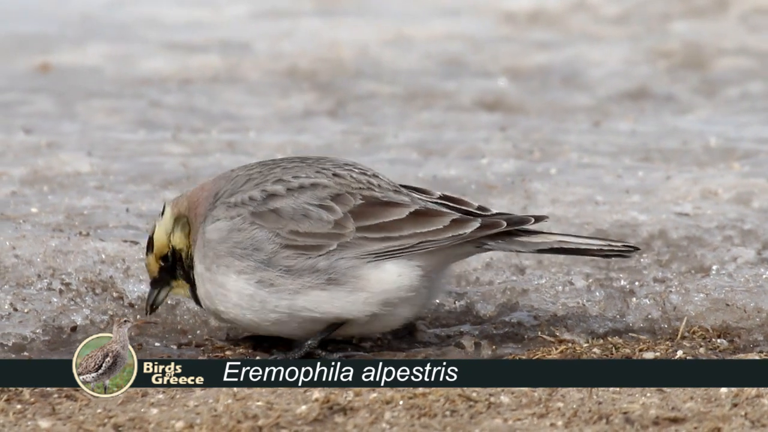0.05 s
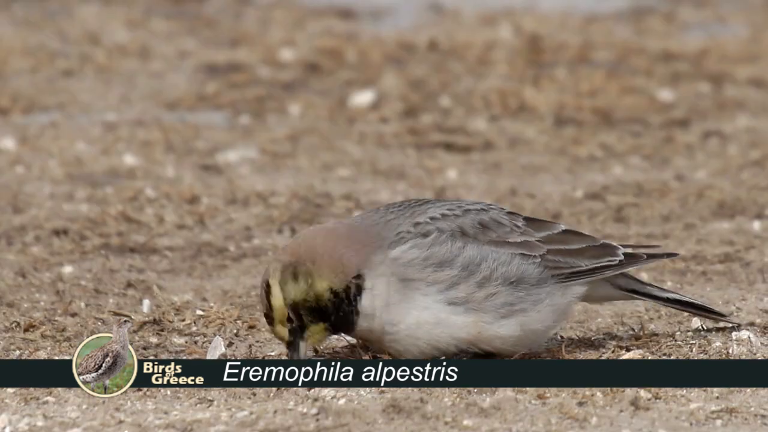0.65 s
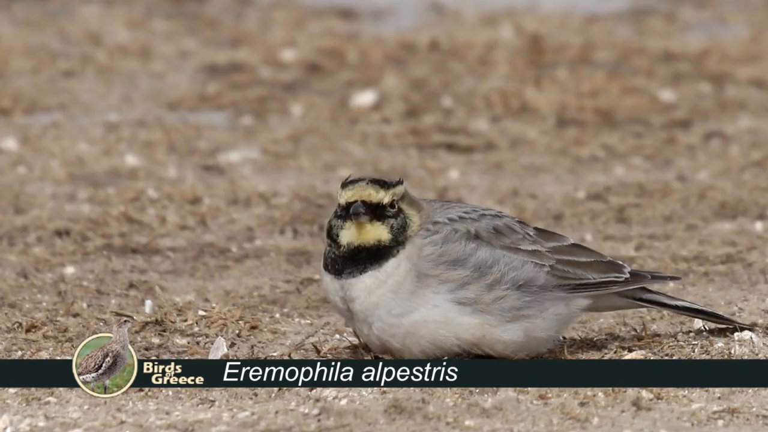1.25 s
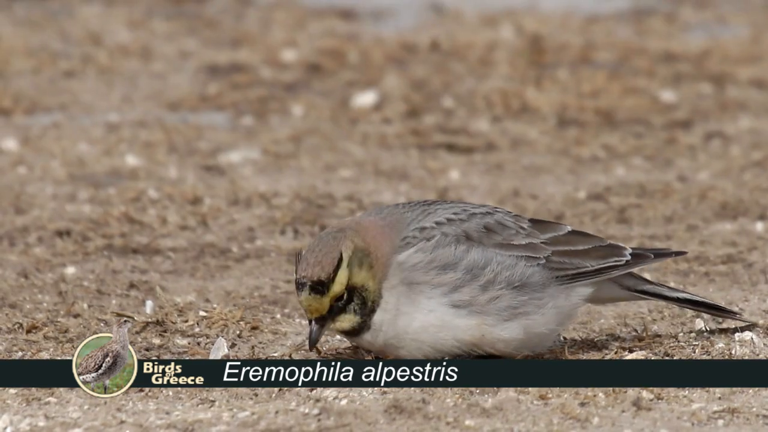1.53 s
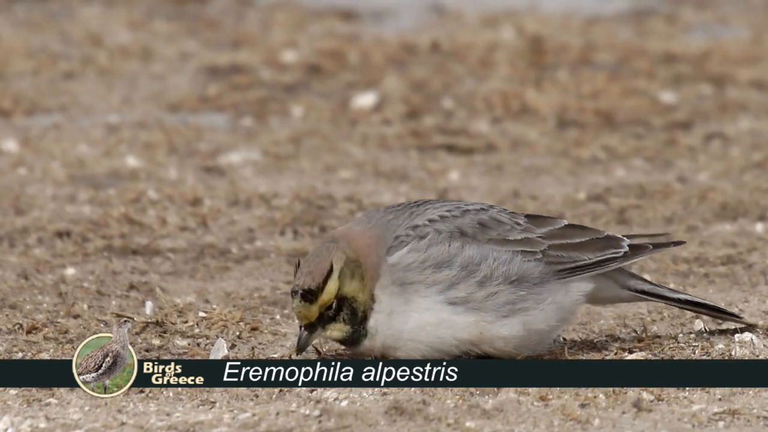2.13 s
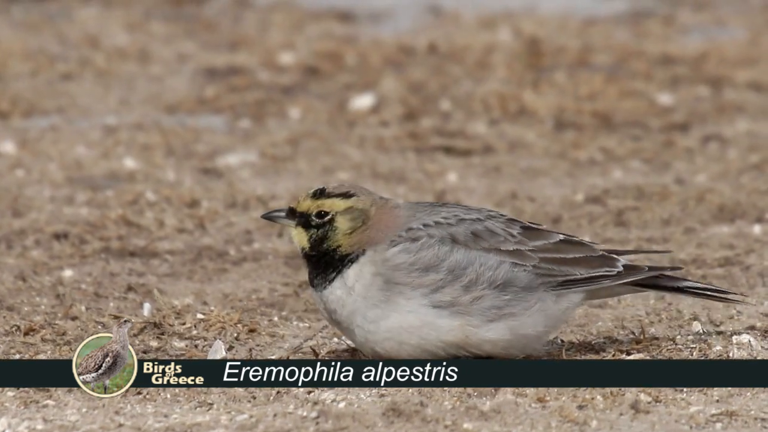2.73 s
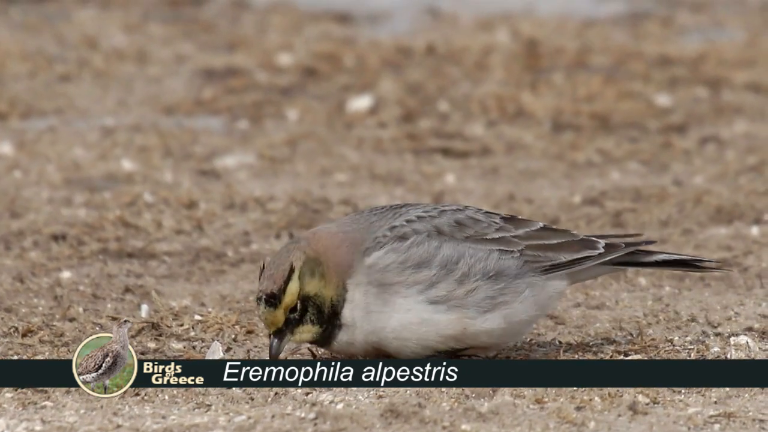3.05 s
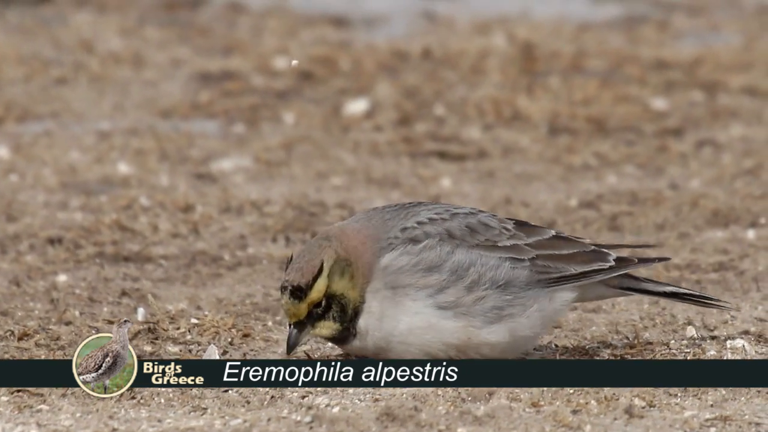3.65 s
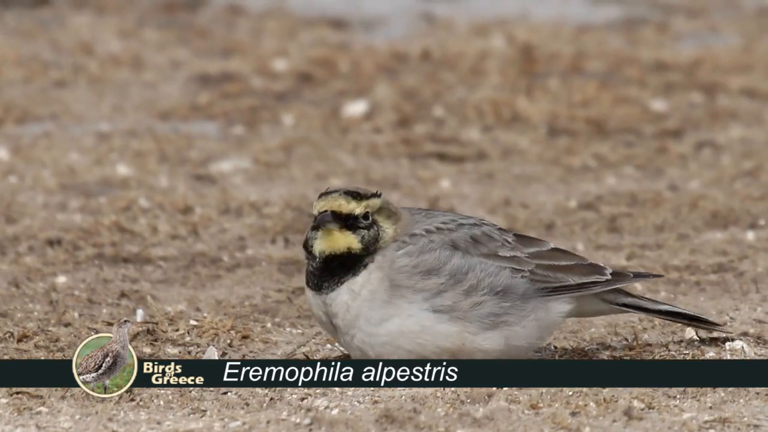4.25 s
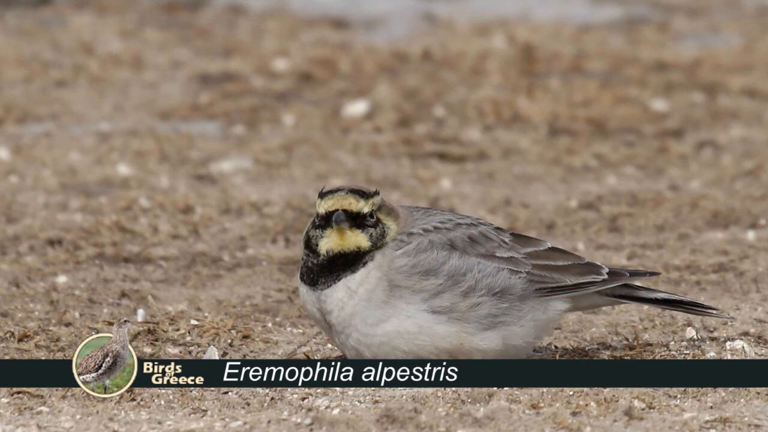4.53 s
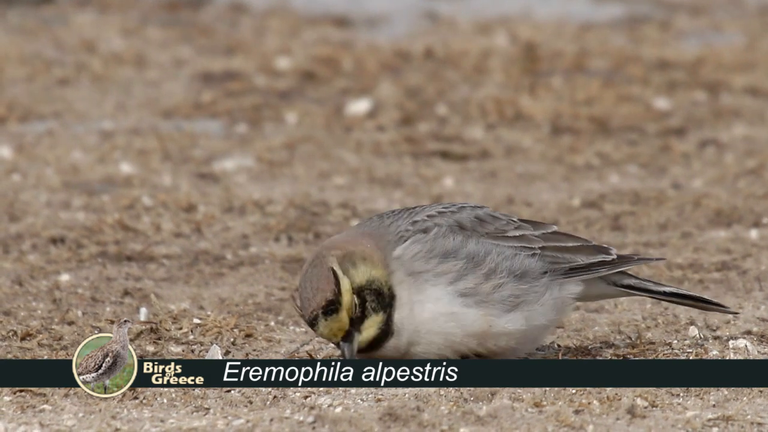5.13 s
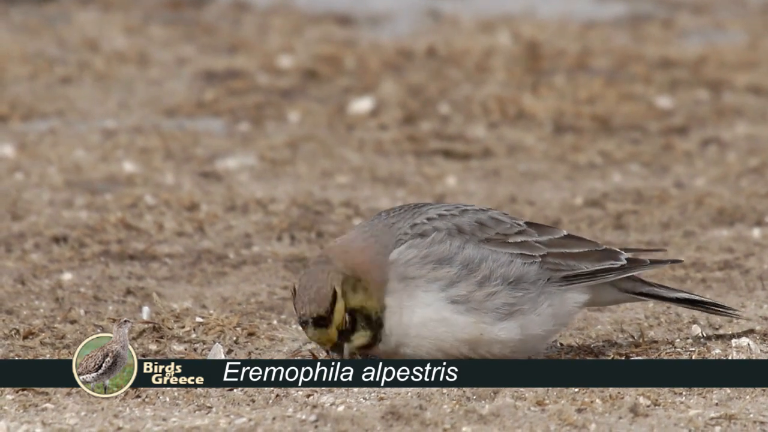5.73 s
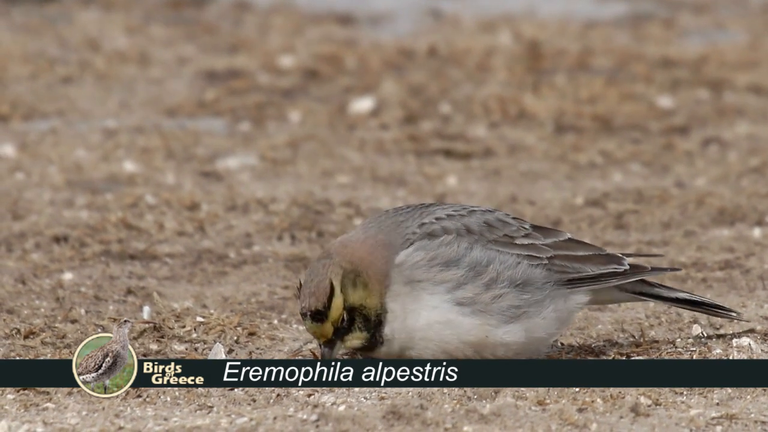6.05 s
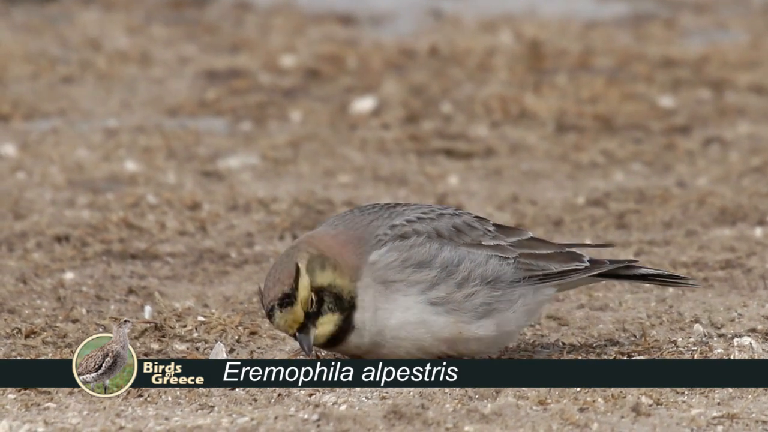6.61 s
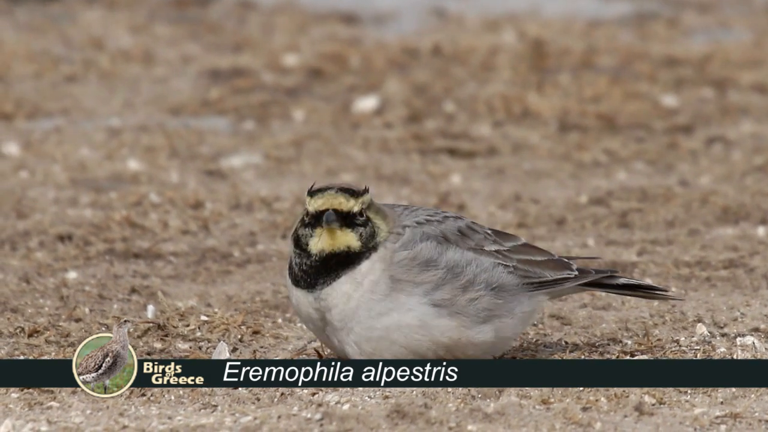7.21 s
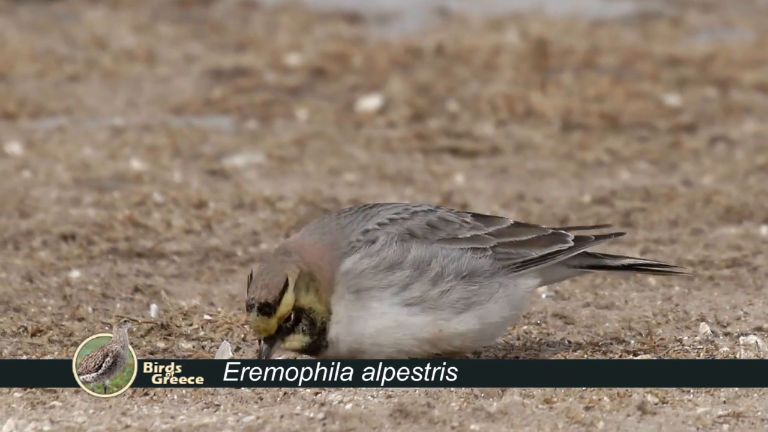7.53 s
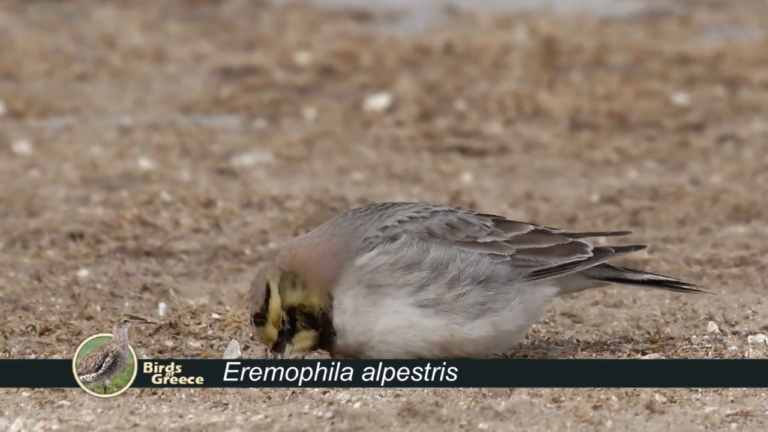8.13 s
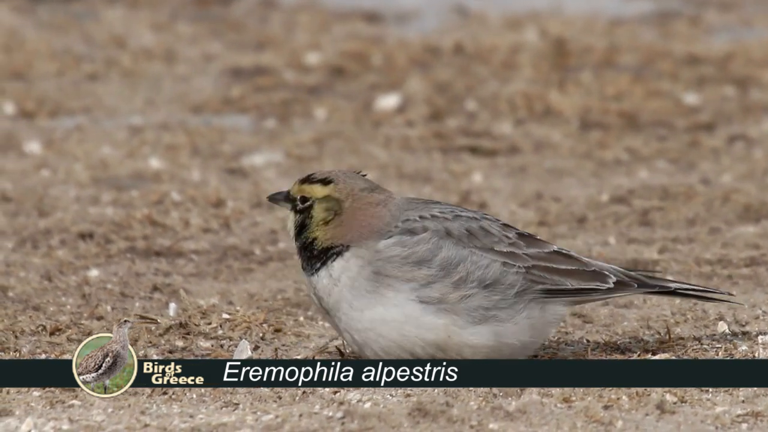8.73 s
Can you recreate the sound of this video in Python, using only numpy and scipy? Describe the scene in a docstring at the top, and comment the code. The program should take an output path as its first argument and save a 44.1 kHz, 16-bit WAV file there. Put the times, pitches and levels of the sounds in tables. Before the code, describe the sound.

Thin, quick whistles and buzzy trills tumble from a small songbird nearby, with a soft, steady hiss of open air behind.

```python
"""Open ground, one microphone, a lark close by. A steady hiss lies behind it from the start.
The bird opens with faint, hoarse ticks and a rasp, then runs on in thin whistles and buzzy trills,
each a gliding tone from the syrinx, whose two sides sometimes sing different notes at once.
Past two seconds comes a stutter of pips; later, syllables return changed in level, pitch and length,
and a falling whistle ends the run. The recorder's low cut takes out the scene below the song."""
import sys
import numpy as np
from scipy import signal
from scipy.fft import rfft, irfft
from scipy.io import wavfile
from scipy.ndimage import uniform_filter1d

SR = 44100
rng = np.random.default_rng(int(sys.argv[2]) if len(sys.argv) > 2 else 0)


def materialize(psi):
    """Save the field psi as 16-bit PCM at rate SR to the path in sys.argv[1].

    A 1-D psi becomes a single channel; in a 2-D psi each row is a channel.
    """
    bounded = np.clip(np.atleast_2d(psi).T, -1, 1)
    quanta = np.round(bounded * 32767).astype(np.int16)
    wavfile.write(sys.argv[1], SR, quanta)


N = 391166

# Hiss of the open air: (frequency [Hz], relative density [dB])
AIR_SPECTRUM = [(1180, -75.5), (2000, -42), (2370, -23.5), (2640, -4.5), (3570, 0), (4480, -1), (5460, -9),
                (6160, -21.5), (8000, -28), (10400, -51), (17600, -120)]
# The recorder's thin electronic hiss: (frequency [Hz], relative density [dB])
HISS_SPECTRUM = [(8000, -25), (10000, -22), (12000, -7), (13500, -1), (16000, -0.5)]
# A very faint rumble: (frequency [Hz], relative density [dB])
RUMBLE_SPECTRUM = [(25, 2), (330, -5.5), (2200, -11.5)]
AIR_DB, HISS_DB, RUMBLE_DB = -63.5, -68.5, -99  # levels ahead of the recorder's filters

# The song: (time [s], syllable, gain [dB], pitch [ratio], length [ratio])
# A syllable is all the chips, slurs and trills that bear its name; the song scales their base values.
SONG_ORDER = [(0.145, "ticks", -19.5, 0.91, 0.88), (0.23, "up tick", -15, .75, 1.2),
              (0.235, "rasp", -23.5, 1, 1.05), (0.402, "twin hooks", -9.5, 1.026, 1.14),
              (0.557, "falling trill", -8, 1.002, 0.93), (0.714, "upsweep", -5.5, 1.025, 0.93),
              (0.882, "purr", 1.5, 1.001, 0.97), (0.961, "soft arch", 5.5, 1.07, 0.82),
              (1.037, "slide", -1.5, 1.016, 1.04), (1.095, "flicks", -4, 1.014, 0.92),
              (1.218, "long fall", 1, 1.014, 0.92), (1.419, "twitter", -5, 1.02, 1),
              (1.773, "low whistle", 0, 0.99, .75), (1.814, "duet", -0.5, 1, 1.03),
              (2.067, "ticks", -2.5, 1, 0.99), (2.169, "rasp", -2.5, 0.98, 1.03),
              (2.327, "up tick", 1, 1.41, 1.35), (2.561, "rising whistle", 0, 0.99, 0.95),
              (2.7975, "tumble", 0, 1.004, 0.9755), (3.012, "short fall", 1, 1.001, 1.06),
              (3.129, "low buzz", -3.5, 0.97, 1.014), (3.3015, "up tick", -3.5, 0.99, 1.25),
              (3.309, "high note", 4, 1.006, 0.96), (3.3434, "up tick", -6.5, 0.84, 0.79),
              (3.491, "rising buzz", 2, 0.977, 0.86), (3.5803, "undersong", -1.5, 1.006, 1.04),
              (3.854, "down tick", -1.5, 0.99, 1), (3.864, "chirrup", -2, 1.01, 0.97),
              (4.0858, "warble", -1.5, 0.98, 0.95), (4.301, "twin hooks", -2, 1.02, 0.906),
              (4.4551, "falling trill", -1, 0.99, 1.03), (4.5512, "soft arch", 1, 0.93, 0.98),
              (4.616, "upsweep", -2.5, 1.017, 1.01), (4.671, "soft arch", 2, 0.98, 1.05),
              (4.8023, "purr", 0, 0.9905, 0.93), (5.026, "flicks", -6.5, 1.015, 0.93),
              (5.148, "long fall", -0.5, 1, 1), (5.35, "twitter", -1, 1.022, 0.95),
              (5.676, "low whistle", -11, 0.983, 1.07), (5.923, "even rasp", -1.5, 0.99, 1.026),
              (6.0402, "rasp", -5.5, 1.023, 0.93), (6.135, "soft arch", -2.5, 0.88, 0.93),
              (6.202, "twin hooks", 0.5, 0.99, 0.97), (6.3754, "rising whistle", 0, 1.001, 0.92),
              (6.5978, "drop", 0, 1.036, 0.98), (6.688, "short fall", -9, 1.01, 1.03),
              (6.8249, "level buzz", -0.5, 0.992, 0.95), (6.997, "high note", -4.5, 1.006, 0.93),
              (7.172, "rising buzz", -14.5, 1.044, 1), (7.257, "undersong", -9.5, 1.033, 1.04),
              (7.4753, "quaver", -1.5, 1.005, 0.89), (7.766, "down tick", -21.5, 1.21, 0.93),
              (7.81, "down tick", -11, 1.14, 0.89), (7.97, "falling trill", -4, 1.02, 0.99),
              (8.144, "upsweep", -2, 1.017, 0.99), (8.329, "purr", -2, .99, 1.15),
              (8.568, "flicks", -1, 1.012, 1), (8.6898, "broken fall", 1, 1.001, 1.018)]
# Short chips: (syllable, delay [s], length [s], level [dB], growth [dB], pitch at 3 even steps [Hz])
CHIP_NOTES = [("twin hooks", .008, .026, -28, 0, 6400, 6050, 7300),
              ("twin hooks", .045, .026, -25, 1, 6400, 6200, 7450),
              ("upsweep", .074, .018, -31, 6, 6150, 5850, 5500),
              ("upsweep", .091, .009, -33, -6, 5400, 3900, 3300),
              ("flicks", 0, .014, -38, 0, 4500, 5300, 6900),
              ("flicks", .02, .014, -35, 0, 5900, 5200, 5000),
              ("flicks", .055, .052, -28, -6, 6700, 5800, 5750),
              ("twitter", .015, .018, -30, 0, 6700, 6150, 6100),
              ("twitter", .035, .026, -28, 4, 5250, 5480, 6000),
              ("twitter", .061, .012, -35, -8, 4600, 4950, 6400),
              ("twitter", .107, .016, -27, -12, 5400, 5650, 3800),
              ("ticks", .0107, .006, -20, -4, 2560, 3240, 4000),
              ("ticks", .0312, .007, -20, -6, 2580, 3270, 2800),
              ("ticks", .0465, .015, -18, -6, 2490, 3270, 2400),
              ("tumble", .036, .015, -26, -2, 5250, 4800, 5700),
              ("tumble", .069, .016, -22, 6, 5900, 4600, 3400),
              ("tumble", .0893, .015, -27, 8, 5400, 3800, 3300),
              ("tumble", .1038, .02, -39, -16, 2850, 2680, 2520),
              ("chirrup", 0, .027, -39, 0, 4700, 3650, 4940),
              ("chirrup", .0016, .022, -35, 0, 3230, 2850, 2870),
              ("chirrup", .0265, .022, -26, -10, 2330, 3330, 2480),
              ("warble", 0, .031, -31, 5, 2960, 3190, 3180),
              ("warble", .062, .017, -21, -3, 2800, 4370, 3100),
              ("warble", .079, .019, -28, -16, 3420, 4000, 3200),
              ("purr", 0, .024, -29, 3, 2980, 2980, 3080),
              ("high note", .04, .044, -25, -12, 6130, 6200, 6300),
              ("down tick", 0, .012, -23, 0, 5000, 3660, 2700),
              ("up tick", 0, .007, -27, 0, 2780, 4200, 5300),
              ("soft arch", 0, .027, -50, 0, 3150, 3750, 3100)]
CHIP_SWELL_DB = 9.5
# Long slurs: (syllable, delay [s], length [s], level [dB], growth [dB], swell [dB],
# pitch at 5 even steps [Hz])
SLUR_NOTES = [("upsweep", 0, 0.064, -22, 1.4, 20, 4760, 4797, 5076, 5420, 6500),
              ("long fall", 0, 0.1443, -32.5, 20.6, 1.9, 4710, 4495, 4344, 4026, 3716),
              ("broken fall", 0, .11, -25.5, 3, 23, 4900, 4524, 4360, 4150, 3950),
              ("broken fall", .104, 0.033, -30.5, 25, 9.5, 3990, 3850, 3807, 3708, 3680),
              ("slide", 0, .11, -40, -7, 7, 3280, 3130, 3070, 2895, 2830),
              ("rising whistle", 0, 0.17, -22, 0, 12.5, 3740, 3763, 3990, 4137, 4227),
              ("short fall", 0, 0.062, -18, 2, 19.1, 5400, 5164, 5136, 4855, 4640),
              ("drop", 0, 0.053, -26.5, -23.5, 15.3, 3260, 3070, 2850, 2723, 2660),
              ("low whistle", 0, 0.059, -32.5, -8.5, 0, 2870, 2750, 2680, 2640, 2660)]
# Trills: (syllable, delay [s], length [s], level [dB], growth [dB], swell [dB],
# pitch at 4 even steps [Hz], pulse rate at 3 even steps [1/s], pitch arch in a pulse [Hz],
# pitch slide in a pulse [Hz], depth of the gaps [0-1])
TRILL_NOTES = [("twin hooks", -.012, .097, -53, 0, 11, 2900, 3320, 3270, 3050, 40, 31, 28, 261, -42, .7),
               ("falling trill", 0, .088, -17.5, 14, 11, 4590, 4480, 4280, 3500, 102, 101, 79, -90, 10, .75),
               ("purr", .026, .142, -24, -7, 1, 3030, 3140, 3170, 3050, 47.5, 47.5, 47.5, 80, -20, .96),
               ("twitter", .01, .1, -53, -12, 0, 3350, 2900, 3200, 2850, 93, 60, 46, 78, -8, .8),
               ("twitter", .07, .038, -29, -2, 2, 6570, 6400, 6150, 6200, 113, 129, 167, -79, 38, .95),
               ("duet", 0, .15, -39, -8, 8, 2400, 2780, 2680, 2600, 73.9, 57.5, 60, 330, -30, 1),
               ("duet", .005, .15, -41, -2, 5, 4930, 5070, 4810, 4710, 75, 56.3, 62, -170, 0, 1),
               ("rasp", 0, .063, -16, -24, 6, 3400, 3880, 2980, 3500, 130, 145.6, 258, -6, 150, .97),
               ("even rasp", 0, .072, -19, -30, 15, 2480, 3880, 2875, 3900, 165.5, 171.7, 255, 197, -130, .85),
               ("tumble", 0, .038, -31, 10, 4, 6170, 5950, 5970, 5600, 94, 91, 87, -170, -230, .76),
               ("low buzz", 0, .082, -24, 16, 6, 2650, 2750, 2850, 2800, 150, 128, 120, 100, -60, .92),
               ("low buzz", .077, .096, -18, -14, 12, 2800, 3050, 3050, 2750, 98, 88, 86, 170, -150, .95),
               ("level buzz", 0, .17, -27, 8, 15, 2600, 2930, 2890, 2980, 157.4, 98, 73.6, 130, -50, .8),
               ("high note", 0, .038, -33, 4, 2, 5450, 5800, 6040, 6000, 62, 52, 50, -110, 0, .85),
               ("rising buzz", 0, .175, -19, -4, 21, 4200, 4600, 5400, 6050, 140, 95, 65, -140, -60, .6),
               ("undersong", 0, .1, -34, -6, 14, 2590, 2810, 2985, 3200, 147.7, 73, 95, 135, -15, .82),
               ("warble", .021, .042, -30, 1, 1, 4150, 4150, 4100, 4050, 49, 50, 51, 1050, 0, .1),
               ("quaver", 0, .048, -46, 14, 2, 4000, 3600, 3250, 3000, 140, 140, 140, 0, 300, .7),
               ("quaver", .04, .165, -27.5, -6, 0, 2980, 3070, 3043, 2890, 77, 53, 68, 160, -75, .4)]
# Hoarse syllables, base levels against the tone: (syllable, rough partial [dB], scratch [dB])
HOARSENESS = [("ticks", -32.5, -10), ("rasp", -31.5, -16), ("even rasp", -23.5, -32),
              ("low buzz", -15.5, -11), ("level buzz", -24, -22), ("quaver", -34.5, -25.5)]
# The throat's passband: (frequency [Hz], gain [dB])
THROAT_RESPONSE = [(4200, 0.5), (4800, -3.5), (5400, -12.5), (6000, -24.5), (7200, -36)]

# The stutter: base pitch and level at its start, middle and end
STUTTER_HZ, STUTTER_DB = [5300, 4220, 3876], [-41, -28.5, -24.5]
STUTTER_START_S, PIP_GAP_S, PIP_LENGTH_S, PIP_FALL_HZ = 2.3535, .0221, .013, 600


def undb(db):
    """Decibels to gain."""
    return 10 ** (np.asarray(db) / 20)


def arc(points, u):
    """The smooth curve through evenly spaced points, read at u from 0 to 1."""
    return np.polyval(np.polyfit(np.linspace(0, 1, len(points)), points, len(points) - 1), u)


def flutter(count, hz):
    """Random wavering slower than hz, spread 1."""
    slow = signal.sosfilt(signal.butter(2, hz, fs=SR, output="sos"), rng.standard_normal(N // 8))
    return slow[-count:] / slow.std()


def add(track, start, sound):
    """Mix a sound into the track at a time in seconds."""
    i = max(int(start * SR), 0)
    track[i:i + len(sound)] += sound[:N - i]


def noise(spectrum, db):
    """Steady noise of a given colour and level."""
    hz, shape_db = np.transpose(spectrum)
    bins = np.maximum(np.arange(N // 2 + 1) * SR / N, 1)
    gain = undb(np.interp(np.log(bins), np.log(hz), shape_db, left=-np.inf, right=-np.inf))
    coloured = irfft(rfft(rng.standard_normal(N)) * gain, N)
    return coloured * undb(db) / coloured.std()


def open_air():
    """The steady hiss of the place, behind the bird."""
    return noise(AIR_SPECTRUM, AIR_DB)


def pressure(u, level_db, growth_db, swell_db):
    """Air pressure over a note in dB: it swells toward the middle and grows or fades as a whole."""
    return level_db + growth_db * (u - .5) - swell_db * (2 * u - 1) ** 2


def throat(hz):
    """Gain of the throat: it passes the middle of the voice and muffles high notes."""
    points_hz, gain_db = np.transpose(THROAT_RESPONSE)
    return undb(np.interp(hz, points_hz, gain_db))


def syrinx(hz, amplitude, rough_db, edge_share, waver=.00047, shimmer_db=.47, flutter_hz=300,
           muffle_hz=4850, undertone_above_hz=5400):
    """A vibrating membrane: an almost pure, slightly unsteady tone."""
    count = len(hz)
    t = np.arange(count) / SR
    edge_s = .002 + edge_share * t[-1]  # longer notes start and stop more softly
    edges = np.sin(np.pi / 2 * np.minimum(np.minimum(t, t[-1] - t) / edge_s, 1))
    phase = 2 * np.pi * np.cumsum(hz * (1 + waver * flutter(count, flutter_hz))) / SR
    tone = np.sin(phase) + undb(-66) * np.sin(2 * phase)
    # pushed hard, the membrane doubles its period: a partial a fifth up, muffled by the throat when high
    muffle = 1 / (1 + (1.5 * hz / muffle_hz) ** 20)
    rough = undb(rough_db) * muffle * np.sin(1.5 * phase + .23 * flutter(count, hz=400))
    # the highest notes carry a faint undertone an octave below, hardly louder in loud notes
    highness = np.clip(10 * np.log(hz / undertone_above_hz) + .5, 0, 1)
    under_gain = undb(-46) * highness * np.minimum(amplitude, .01) ** .18
    undertone = under_gain * np.sin(phase / 2 + .5 * flutter(count, flutter_hz))
    shimmer = undb(shimmer_db * flutter(count, flutter_hz))
    return ((tone + rough) * amplitude + undertone) * edges * shimmer


def whistle(length, effort, pitch, ratio, rough_db, sway=.003, sway_db=.07, sway_hz=28):
    """One smooth gesture: tension bends the pitch while air pressure swells and fades; both sway."""
    u = np.linspace(0, 1, int(length * SR))
    hz = ratio * arc(pitch, u) * (1 + sway * flutter(len(u), sway_hz))
    level_db = pressure(u, *effort) + sway_db * flutter(len(u), sway_hz)
    return syrinx(hz, undb(level_db) * throat(hz), rough_db, edge_share=.066)


def scratch(tone, chaos, grain_db=4, grain_hz=150, follow=.22):
    """In hoarse syllables the membranes also flap chaotically: a grainy scratch throbs with the notes."""
    push = (uniform_filter1d(np.abs(tone), size=90) + .0018) ** follow
    swell = np.hanning(len(tone)) ** .5
    grain = undb(grain_db * flutter(len(tone), grain_hz))
    return chaos[:len(tone)] * tone.std() * push / push.mean() * swell * grain


def trill(length, effort, controls, ratio, rough_db, shake=.013, shake_hz=600, uneven_db=1, uneven_hz=45):
    """A glide chopped by a fast valve: each closing dips the level, tugs the pitch and unsettles it."""
    u = np.linspace(0, 1, int(length * SR))
    pitch, pulse_rate, (arch, slide, depth) = np.split(np.array(controls), [4, 7])
    cycle = 2 * np.pi * np.cumsum(arc(pulse_rate, u)) / SR
    closing = ((1 + np.cos(cycle)) / 2) ** 2
    hz = ratio * arc(pitch, u) - arch * np.cos(cycle) + slide * np.sin(cycle)
    hz *= 1 + shake * closing * flutter(len(u), shake_hz)
    level_db = pressure(u, *effort) + uneven_db * flutter(len(u), uneven_hz)
    amplitude = undb(level_db) * throat(hz) * (1 - depth * closing)
    return syrinx(hz, amplitude, rough_db, edge_share=.13)


def syllable(name, ratio, stretch, rough_db):
    """One syllable of the repertoire, sung higher or lower, longer or shorter."""
    notes = [(whistle, delay, length, (db, growth, CHIP_SWELL_DB), pitch)
             for owner, delay, length, db, growth, *pitch in CHIP_NOTES if owner == name]
    for voice, table in ((whistle, SLUR_NOTES), (trill, TRILL_NOTES)):
        notes += [(voice, delay, length, (db, growth, swell), controls)
                  for owner, delay, length, db, growth, swell, *controls in table if owner == name]
    sung = np.zeros(SR)
    for voice, delay, length, effort, controls in notes:
        add(sung, delay * stretch, voice(length * stretch, effort, controls, ratio, rough_db))
    return np.trim_zeros(sung, "b")


def lark():
    """The bird near the microphone, syllable by syllable; all but the hoarse ones are clear."""
    song = np.zeros(N)
    chaos = noise([(2400, -13), (2900, 4.5), (4300, 1.5), (5500, -25)], db=0)
    hoarse = {name: levels for name, *levels in HOARSENESS}
    for start, name, db, ratio, stretch in SONG_ORDER:
        rough_db, scratch_db = hoarse.get(name, (-np.inf, -np.inf))
        tone = syllable(name, ratio, stretch, rough_db)
        grit = undb(scratch_db) * scratch(tone, np.roll(chaos, -int(start * SR)))
        add(song, start, undb(db) * (tone + grit))
    return song


def ground_scatter(song, t60_s=.15, wet_db=-40):
    """Rough open ground scatters a faint, very short tail back to the microphone."""
    t = np.arange(SR // 4) / SR
    tail = rng.standard_normal(len(t)) * np.exp(-np.log(1000) * t / t60_s)
    return undb(wet_db) * signal.fftconvolve(song, tail / np.linalg.norm(tail))[:N]


def stutter(count=6, growth_db=2):
    """A quick, even run of falling pips that sinks in pitch and grows louder."""
    pips = np.zeros(N)
    for k, u in enumerate(np.linspace(0, 1, count)):
        pitch = arc(STUTTER_HZ, u) + PIP_FALL_HZ * np.array([.5, -.5])
        effort = (arc(STUTTER_DB, u), growth_db, CHIP_SWELL_DB)
        pip = whistle(PIP_LENGTH_S, effort, pitch, ratio=.97, rough_db=-np.inf)
        add(pips, STUTTER_START_S + k * PIP_GAP_S, pip)
    return pips


def scene():
    """At the microphone, in mono: the close bird, its scatter off the ground and the air behind."""
    song = lark() + stutter()
    return (song + ground_scatter(song) + open_air())[None]


def record(dry, low_cut_hz=2320, top_cut_hz=15750):
    """The recorder: a steep low cut, then its own hiss and rumble, then a steep top cut."""
    low_cut = signal.butter(12, low_cut_hz, btype="high", fs=SR, output="sos")
    top_cut = signal.ellip(12, .1, 70, top_cut_hz, fs=SR, output="sos")
    thin = signal.sosfiltfilt(low_cut, dry)
    noisy = thin + noise(HISS_SPECTRUM, HISS_DB) + noise(RUMBLE_SPECTRUM, RUMBLE_DB)
    return signal.sosfilt(top_cut, noisy)


dry = scene()
out = record(dry)
materialize(out)
```